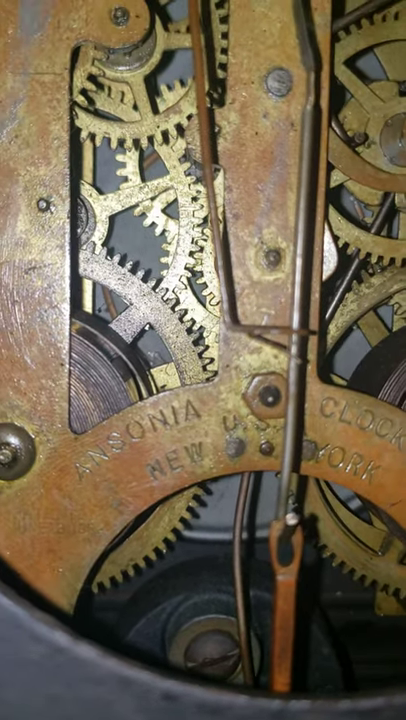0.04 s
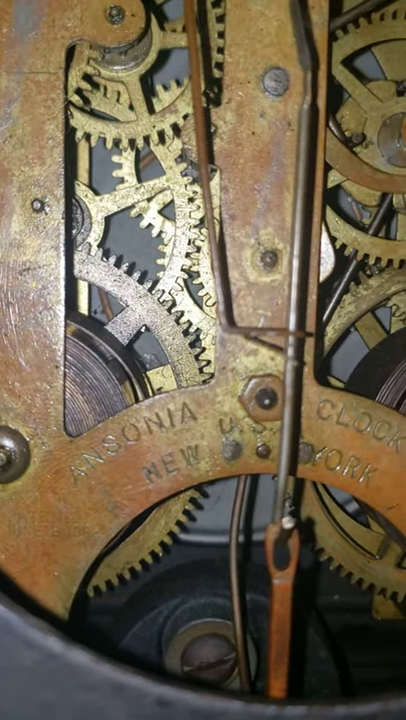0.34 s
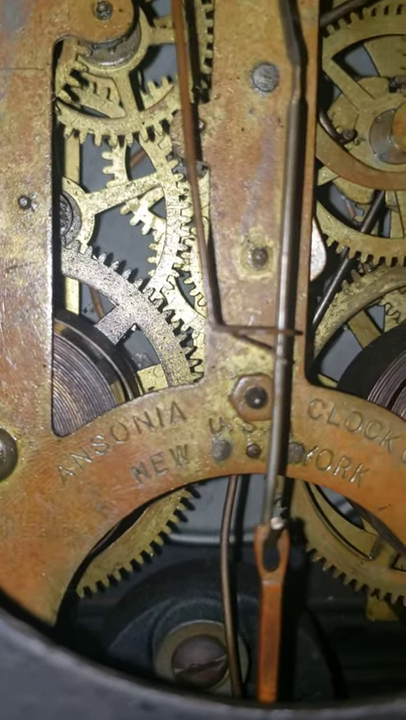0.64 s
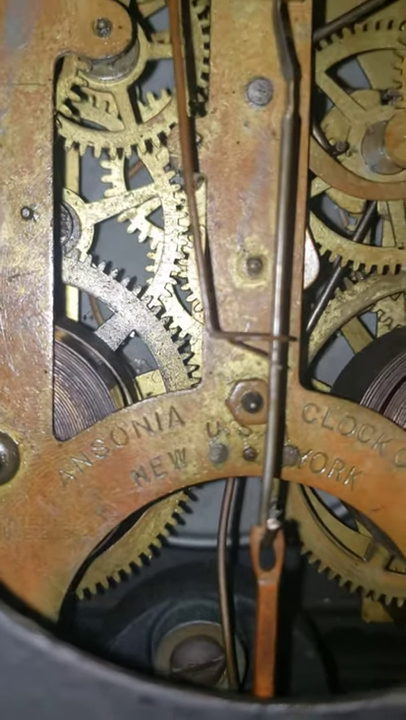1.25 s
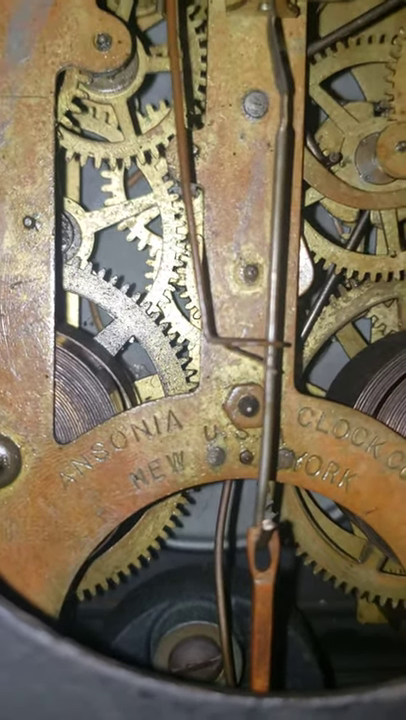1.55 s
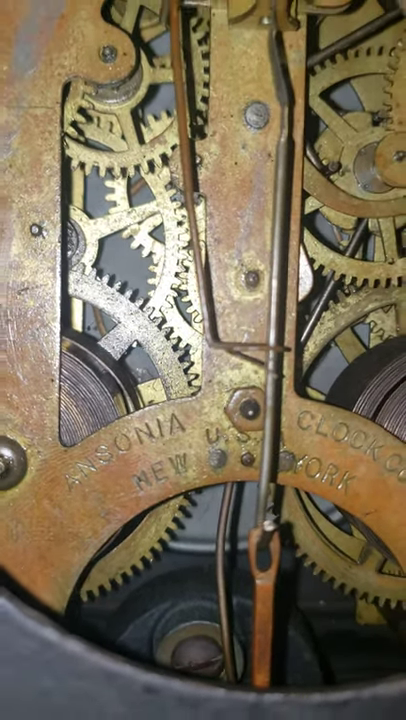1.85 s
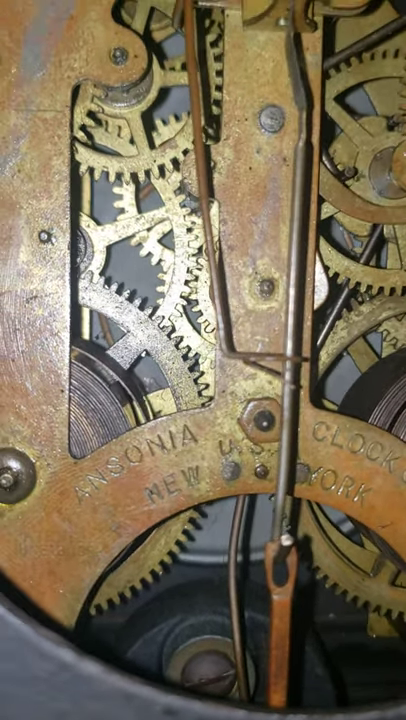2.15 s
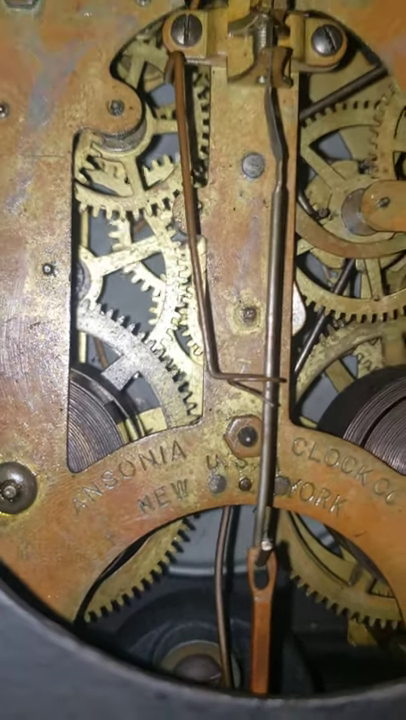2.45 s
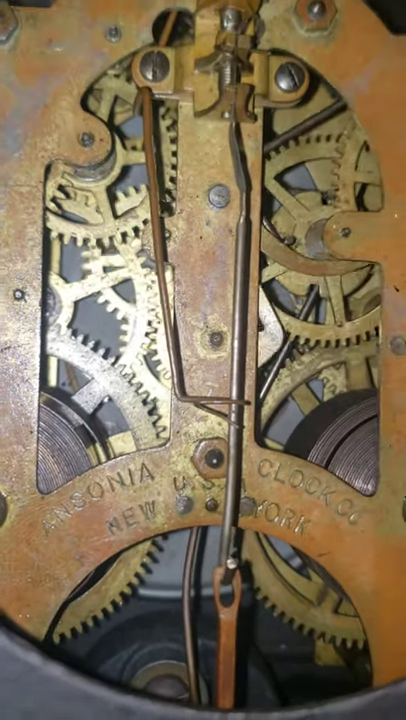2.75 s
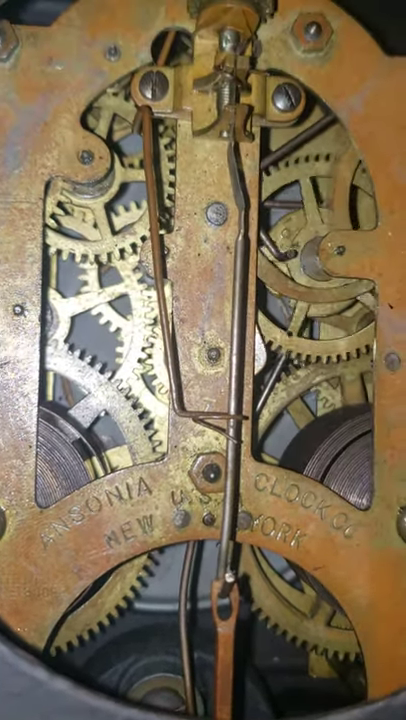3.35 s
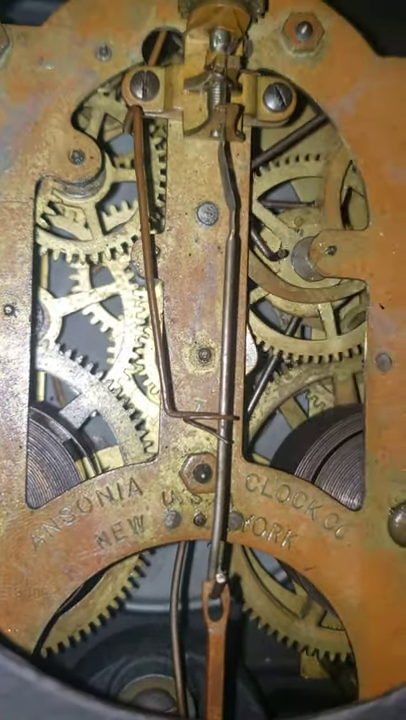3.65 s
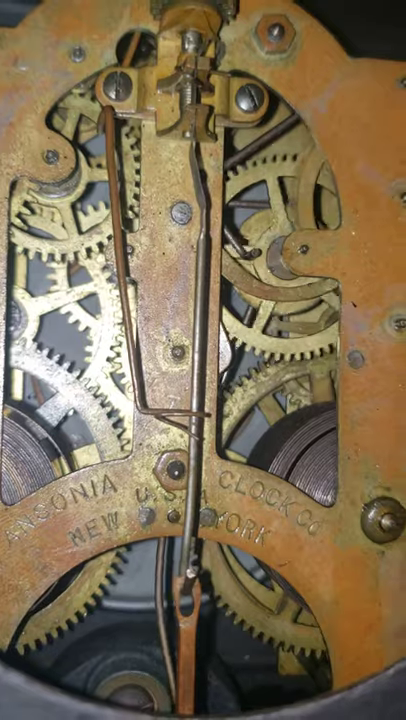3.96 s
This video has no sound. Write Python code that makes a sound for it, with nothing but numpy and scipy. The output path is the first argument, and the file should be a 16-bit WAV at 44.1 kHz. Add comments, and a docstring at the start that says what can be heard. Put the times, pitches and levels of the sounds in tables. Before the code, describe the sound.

A mechanical clock ticks faintly and gets bumped, then snaps into a rapid metallic whirr.

```python
"""Clocks tick faintly across a quiet room while fingers bump, tap and brush an old brass clock movement.
Just before 3 s the strike train is let go and its wheels start to turn, one click per pinion leaf.
At 3.2 s a steel lever snaps over and bounces, ringing the frame. The wheels spin on up into a whirring
rattle that swells once per turn of the fly, with a few hard catches and a brassy ring."""
import sys
import numpy as np
from scipy import signal
from scipy.fft import rfft, irfft, next_fast_len
from scipy.io import wavfile

SR = 44100
rng = np.random.default_rng(int(sys.argv[2]) if len(sys.argv) > 2 else 0)


def unload_wav(signal):
    """Save mono or channel-first audio to the path in sys.argv[1] as 16-bit WAV at rate SR, clipped to [-1, 1]."""
    wavfile.write(
        sys.argv[1],
        SR,
        np.round(np.clip(np.atleast_2d(signal).T, -1, 1) * 32767).astype(np.int16),
    )


N = 176400

# spin-up of the fly: t/s, speed/(turns per s)
FLY_SPEED = [(2.97, 9), (3.08, 14.5), (3.16, 19.5), (3.2, 20), (3.27, 17.5), (3.35, 22.5), (3.44, 27.5),
             (3.56, 33), (3.64, 35), (4, 35)]
# how hard the teeth mesh: t/s, level/dB
MESH_FORCE = [(2.96, -88), (3.0, -54), (3.055, -52), (3.08, -45.5), (3.15, -42), (3.29, -43.5), (3.34, -39),
              (3.45, -39), (3.56, -40), (3.8, -40), (4, -39.5)]
# bright rattle of the mesh: f/Hz, level/dB
MESH_EQ = [(150, -33), (500, -19.5), (1200, -12), (2200, -2.5), (3500, -6), (4100, -5.5), (5300, -4.5),
           (7300, 3), (8200, -9), (9300, -3), (11000, -4), (13800, -10.5), (15600, -15)]
# teeth that catch hard: t/s, level/dB
TOOTH_CATCHES = [(3.371, -35), (3.41, -32), (3.522, -30.5), (3.551, -27), (3.582, -29.5), (3.759, -28.5),
                 (3.831, -31), (3.925, -32.5)]
# ring of wheels and plates: f/Hz, t60/s, level/dB
BRASS_MODES = [(309.8, 0.22, -5.5), (805.4, 0.16, -4), (1581, 0.23, 2.5), (1625, 0.2, 3), (1684, .09, 2),
               (1890, 0.28, 0.5), (2094, 0.04, 0), (2830, 0.1, -7), (3015, 0.028, -2.5),
               (5215, 0.047, -1.5), (5400, 0.046, -1), (6586, 0.079, 4.5), (6647, 0.033, 4.5),
               (7060, 0.027, 1.5), (9200, 0.029, 1), (10820, .11, 0)]
# stereo width of that ring: f/Hz, L-R likeness
BRASS_LIKENESS = [(380, 1), (750, -0.77), (1600, 0.043), (2400, -0.59), (5000, 0.22)]

# the lever's snap and bounces: t/s, level/dB, t60/s
LEVER_HITS = [(3.176, -19.5, 0.047), (3.1973, -7, 0.0045), (3.222, -25.5, 0.018), (3.2463, -28, 0.0083)]
# steely crack of the lever: f/Hz, level/dB
LEVER_EQ = [(200, -11), (1000, -7.5), (2700, -10), (4200, -11), (5500, 2), (7300, -2.5), (8200, -5),
            (10000, 4), (11100, 7), (12600, 1.5), (13900, -7), (15200, -3)]
# the lever's blows on the frame: t/s, level/dB
FRAME_HITS = [(3.1775, -11.5), (3.1975, -10)]
# ring of the frame: f/Hz, t60/s, level/dB
FRAME_MODES = [(239.2, 0.25, 5.5), (315, 0.16, -1), (368, 0.18, -3.5), (502, .12, -10.5), (783, .15, -5),
               (1607, 0.083, -3), (1904, 0.14, -5), (2444, 0.15, -11), (3290, .03, -5)]
# frame and case radiate little bass: f/Hz, level/dB
KNOCK_EQ = [(40, -49), (170, -18), (270, 3), (15000, 2.5)]
# the plate swings up while the lever flies and is checked as it lands: t/s, level/dB
PLATE_SWING = [(3.173, -120), (3.178, -43), (3.185, -42.5), (3.192, -32), (3.197, -38.5), (3.205, -64),
               (3.22, -120)]

# bumps on the case: t/s, thud/dB, click/dB, boom/dB, rise/s
CASE_BUMPS = [(0.13, -44.5, -33.5, -23.5, 0.0012), (0.341, -46.5, -36.5, -29, 0.002),
              (0.368, -45, -34.5, -25, 0.0047), (0.821, -49.5, -48, -20, 0.00903),
              (1.542, -44, -54.5, -26, 0.0014), (1.571, -49.5, -59, -18, 0.00214),
              (2.016, -53.5, -63, -27, 0.0012), (2.53, -57.5, -43, -25.5, 0.0018)]
# dull body of a bump: f/Hz, level/dB
THUD_EQ = [(60, -17.5), (180, -5), (300, 4), (430, -6.5), (600, -8), (820, 1.5), (1100, -10), (1900, -20),
           (9000, -58)]
# sharp edge of a bump or a loose part: f/Hz, level/dB
CLICK_EQ = [(200, -4.5), (1000, -25), (1700, -1.5), (1950, 9), (2300, -1), (3300, -2.5), (5000, -1.5),
            (5650, 5.5), (7200, 1), (8500, -10.5), (12000, -11), (15500, -22)]
# boom of the case: f/Hz, t60/s, level/dB
CASE_MODES = [(239, 0.13, -0.5), (309.4, 0.19, 4), (366.4, 0.17, -2), (536.6, 0.15, -2.5), (767, 0.15, -5),
              (1940, 0.066, -17.5)]
# small ticks of loose parts: t/s, level/dB
LOOSE_TICKS = [(0.914, -53.5), (1.818, -51), (2.272, -47.5), (2.546, -39), (2.804, -46.5), (3.018, -54),
               (3.065, -45)]

# finger taps: t/s, level/dB, rise/s, t60/s
FINGER_TAPS = [(.256, -44.5, 0.0023, 0.18), (.604, -50.5, .001, 0.12)]
# soft tone of a tap: f/Hz, level/dB
TAP_EQ = [(200, -5), (750, -8.5), (1000, -7), (1280, -0.5), (1600, -12.5), (9000, -40)]
# brush of a sliding finger: f/Hz, level/dB
SLIDE_EQ = [(300, 4.5), (1500, 0.5), (2800, -1.5), (4100, 1.5), (5500, -9.5), (8000, -20), (15000, -26)]
# thumps of the shifting grip: t/s, level/dB, rise/s, t60/s
GRIP_THUMPS = [(.25, -43.5, 0.034, 0.37), (1.52, -47.5, 0.027, 0.36), (2.02, -49.5, 0.016, 0.3),
               (2.39, -39, 0.044, 0.47), (2.53, -39.5, 0.0017, 0.31), (2.79, -48.5, 0.017, 0.29),
               (3.6, -49, 0.059, 0.87), (3.94, -42.5, 0.018, 0.27)]
# low weight of a thump: f/Hz, level/dB
THUMP_EQ = [(20, -17), (40, -15.5), (60, 6), (105, -1), (200, -11.5), (400, -14), (1500, -50.5)]

# pace of each far clock: first beat/s, period/s
CLOCK_BEATS = [(.058, .5), (.254, .3605), (.09, .376), (.045, .361)]
# shape of each clock's tick: level/dB, rise/s, t60/s, L-R likeness
CLOCK_SHAPES = [(-56, .003, 0.48, -0.046), (-45, 0.02, 0.18, -0.58), (-51.5, .016, 0.29, 0.16),
                (-54.5, 0.018, 0.28, -0.024)]
# voice of each clock, one curve apiece: f/Hz, level/dB
CLOCK_EQS = [
    [(300, -23), (2300, -2.5), (2490, 9), (2750, 1), (3550, -14), (3870, 0.5), (4300, -7.5), (7500, -15),
     (11000, -13.5), (15000, -31)],
    [(200, -20), (960, -4), (1130, -9), (1380, 5.5), (1600, -10.5), (3500, -28), (12000, -50)],
    [(200, -16.5), (850, 7), (1300, -6.5), (2000, -1), (3800, -21.5), (4400, -10), (14000, -39)],
    [(200, -20.5), (750, 0), (2200, 5), (3400, -11), (6200, -6), (8300, -19), (12000, -12.5), (15000, -29)],
]

# decay of the room: f/Hz, t60/s
ROOM_DECAY = [(200, 0.39), (2000, 0.39), (6000, 0.095), (14000, 0.07)]
# bed of rumble and hiss: f/Hz, level/dB
ROOM_TONE_EQ = [(15, -65), (25, -30), (75, -0.5), (305, -10.5), (537, -15), (722, -3.5), (782, -10),
                (895, -5), (1020, -16.5), (1380, -12), (1710, -16), (2560, -15.5), (3530, -23.5),
                (3830, -25), (6210, -17.5), (8350, -32), (15500, -29)]
# narrow hums in the room: f/Hz, level/dB
ROOM_HUMS = [(97, -69.5), (310, -74)]
# default stereo width (1 in phase, -1 opposed): f/Hz, L-R likeness
LIKENESS = [(60, 0.82), (290, 0.95), (640, 0.67), (1410, -0.54), (3100, -0.012), (6800, 0.073),
            (15000, -0.15)]
# pan of gears and lever: f/Hz, L-R/dB
WORKS_PAN = [(100, -1), (350, -7), (1300, 1.5), (4400, -2), (6500, -5.5), (7800, 1), (9500, -12.5),
             (12500, -10), (15500, -5)]
# pan of case, hand and background: f/Hz, L-R/dB
AMBIENT_PAN = [(60, -3.5), (200, 1), (400, -6.5), (1300, 0), (8000, -3)]

LEAVES, HEAVY_AT_S = 6, 3.553  # leaves per pinion; a moment when the swell peaks
SWELL_DB, LEAF_SCATTER_DB, LEAF_JITTER_S = 5, 3, .0005
LEAF_T60, CHATTER_S, CHATTER_DB = 0.016, 0.00295, 1.5
WHIRR_DB, WHEEL_T60, WHEEL_DB = -4.5, 0.045, -7.5
RING_DB, RING_GROWTH = -3, 0.88  # the brass rings more as the fly gains speed
CATCH_T60, CATCH_RING_DB = 0.019, 7.5
LEVER_RING_DB, LEVER_RING_T60, SWING_HZ = -11.5, 0.036, 298
THUD_T60, CLICK_T60, CASE_DB = 0.18, 0.037, -3
SLIDE_S, SLIDE_DB, SLIDE_T60 = 2.338, -43.5, 0.47
WORKS_SEND_DB, CASE_SEND_DB, ROOM_TONE_DB = -8, -6, -61
TOP_HZ = 15900


def gear_train():
    """Each pinion leaf clicks, hardest once a turn, and chatters; some teeth catch; the brass rings."""
    time = np.arange(N) / SR
    speed = curve(FLY_SPEED)
    turns = np.cumsum(speed) / SR
    turns -= np.interp(HEAVY_AT_S, time, turns)
    first_leaf = np.ceil(np.interp(MESH_FORCE[0][0], time, turns) * LEAVES)
    leaf_turns = np.arange(first_leaf, turns[-1] * LEAVES) / LEAVES
    jitter, scatter, lag, bounce = rng.standard_normal((len(leaf_turns), 4)).T
    when = np.interp(leaf_turns, turns, time) + LEAF_JITTER_S * jitter
    force = np.interp(when, *np.transpose(MESH_FORCE)) + LEAF_SCATTER_DB * scatter
    clicks = list(zip(when, force + SWELL_DB * np.cos(2 * np.pi * leaf_turns)))
    chatter = list(zip(when + CHATTER_S * np.exp(0.444 * lag), force + CHATTER_DB + 2 * bounce))
    mesh = bursts([(s, db, .0002, LEAF_T60) for s, db in clicks + chatter])
    catches = bursts([(s, db, .0002, CATCH_T60) for s, db in TOOTH_CATCHES])
    # every leaf also sets off the same dense, short ring of the wheel
    t = np.arange(SR // 16) / SR
    wheel = amp(WHEEL_DB - 60 * t / WHEEL_T60) * rng.standard_normal((2, len(t)))
    buzz = signal.fftconvolve(impulses(clicks)[None], wheel, axes=1)[:, :N]
    shake = amp(RING_DB) * mesh * (speed / FLY_SPEED[-1][1]) ** RING_GROWTH * noise()
    blows = amp(CATCH_RING_DB) * impulses(TOOTH_CATCHES) * np.sign(noise())
    brass = placed(ring(shake + blows, BRASS_MODES), WORKS_PAN, likeness=BRASS_LIKENESS)
    whirr = amp(WHIRR_DB) * (mesh + catches) * noise()
    return placed(whirr + buzz, WORKS_PAN, MESH_EQ) + brass


def lever():
    """A steel lever snaps over and bounces: bright cracks, a knock in the frame, a low plate swing."""
    cracks = [(s, db, .0003, t60) for s, db, t60 in LEVER_HITS]
    tails = [(s, db + LEVER_RING_DB, .001, LEVER_RING_T60) for s, db, _ in LEVER_HITS]
    snap = placed(bursts(cracks + tails) * noise(), WORKS_PAN, LEVER_EQ)
    knock = ring(impulses(FRAME_HITS) * np.array([[1], [-.2]]), FRAME_MODES)  # mid, side
    t = np.arange(N) / SR - LEVER_HITS[0][0]
    swing = amp(curve(PLATE_SWING)) * np.sin(2 * np.pi * SWING_HZ * t) * np.array([[1], [0]])
    return snap + placed(knock, WORKS_PAN, KNOCK_EQ) + placed(swing, WORKS_PAN)


def case():
    """Bumps thud and click on the case and make it boom; loose parts tick."""
    when, thud_db, click_db, boom_db, rises = np.transpose(CASE_BUMPS)
    thuds = bursts([(s, db, rise, THUD_T60) for s, db, rise in zip(when, thud_db, rises)])
    clicks = [(s, db, rise, CLICK_T60) for s, db, rise in zip(when, click_db, rises)]
    ticks = [(s, db, .0003, .014) for s, db in LOOSE_TICKS]
    blows = impulses(list(zip(when + rises, boom_db))) * np.array([[1], [.2]])
    boom = ring(blows + .5 * thuds * noise(), CASE_MODES)
    return (amp(CASE_DB) * placed(boom, AMBIENT_PAN, KNOCK_EQ)
            + placed(thuds * noise(), AMBIENT_PAN, THUD_EQ)
            + placed(bursts(clicks + ticks) * noise(), AMBIENT_PAN, CLICK_EQ))


def hand():
    """Light finger taps, one brushing slide and the low thumps of a shifting grip."""
    taps = placed(bursts(FINGER_TAPS) * noise(), AMBIENT_PAN, TAP_EQ)
    slide = placed(bursts([(SLIDE_S, SLIDE_DB, .035, SLIDE_T60)]) * noise(), AMBIENT_PAN, SLIDE_EQ)
    thumps = placed(bursts(GRIP_THUMPS) * noise(), AMBIENT_PAN, THUMP_EQ)
    return taps + slide + thumps


def far_clocks():
    """Four clocks beat at their own rates, each tick a soft wash that is nearly all room."""
    total = 0
    for (first, period), (db, rise, t60, likeness), eq in zip(CLOCK_BEATS, CLOCK_SHAPES, CLOCK_EQS):
        beats = [(s, db, rise, t60) for s in np.arange(first, N / SR, period)]
        total += placed(bursts(beats) * noise(), AMBIENT_PAN, eq, [(20, likeness)])
    return total


def reverb(send):
    """The small room's tail, dying faster in the treble."""
    hz, t, spectrum = signal.stft(rng.standard_normal((2, SR // 2)), SR, nperseg=256)
    decay = amp(-60 * t / along(ROOM_DECAY, hz)[:, None])
    tail = signal.istft(spectrum * decay, SR, nperseg=256)[1]
    return signal.fftconvolve(send, tail / np.linalg.norm(tail[0]), axes=1)[:, :N]


def room_tone():
    """A steady bed of hiss and rumble with two narrow, wavering hums."""
    hum = sum(amp(db) * ring(noise(), [(hz, .4, 0)]) for hz, db in ROOM_HUMS)
    bed = amp(ROOM_TONE_DB) * placed(noise(), AMBIENT_PAN, ROOM_TONE_EQ)
    return bed + placed(hum, AMBIENT_PAN)


def amp(db):
    """Decibels to gain."""
    return 10 ** (np.asarray(db) / 20)


def along(points, hz):
    """Read a curve of f/Hz, value points on a log frequency axis."""
    f, value = np.transpose(points)
    return np.interp(np.log(hz + 1), np.log(f + 1), value)


def curve(rows):
    """Automation line through rows of t/s, value."""
    return np.interp(np.arange(N) / SR, *np.transpose(rows))


def impulses(rows):
    """One-sample spikes from rows of t/s, level/dB."""
    s, db = np.transpose(rows)
    return np.bincount((s * SR).astype(int), amp(db), minlength=N)[:N]


def bursts(rows):
    """Envelope from rows of t/s, level/dB, rise/s, t60/s; overlaps add in power."""
    power = np.zeros(N + 2 * SR)
    for s, db, rise, t60 in rows:
        t = np.arange(int(min(t60 + .01, 1) * SR)) / SR
        attack = 1 - np.exp(-t / rise)
        power[int(s * SR):][:len(t)] += (attack * amp(db - 60 * t / t60)) ** 2
    return np.sqrt(power[:N])


def noise():
    """Two unrelated white noises."""
    return rng.standard_normal((2, N))


def ring(drive, modes):
    """Resonator with unit power gain; modes are f/Hz, t60/s, level/dB."""
    t = np.arange(SR // 3) / SR
    tone = sum(amp(db - 60 * t / t60) / np.sqrt(t60) * np.sin(2 * np.pi * hz * t)
               for hz, t60, db in modes)
    return signal.fftconvolve(drive, tone[None] / np.linalg.norm(tone), axes=1)[:, :N]


def placed(mid_side, pan, eq=((20, 0), (20000, 0)), likeness=LIKENESS):
    """Turn a mid/side pair into left/right with unit-power EQ, width and pan."""
    size = 2 * next_fast_len(N // 2 + 8192)
    hz = np.fft.rfftfreq(size, 1 / SR)
    gain = amp(along(eq, hz))
    gain /= np.sqrt(np.mean(gain ** 2))
    # minimum phase keeps the attacks free of pre-ring
    cepstrum = irfft(np.log(gain + 1e-6))
    cepstrum[1:size // 2] *= 2
    cepstrum[size // 2 + 1:] = 0
    width = np.arccos(np.clip(along(likeness, hz), -1, 1)) / 2
    mid, side = rfft(mid_side, size) * np.exp(rfft(cepstrum)) * [np.cos(width), np.sin(width)]
    lean = amp(along(pan, hz))
    stereo = np.array([(mid + side) * lean, mid - side]) * np.sqrt(2 / (1 + lean ** 2))
    return irfft(stereo, size)[:, :N]


def scene():
    """The movement up close, with a little reverb, over far clocks and room tone."""
    works, bumps = gear_train() + lever(), case()
    send = amp(WORKS_SEND_DB) * works + amp(CASE_SEND_DB) * bumps
    return works + bumps + reverb(send) + hand() + far_clocks() + room_tone()


def record(dry):
    """Brick-wall high cut on the whole mix."""
    size = next_fast_len(N + 8192)
    passband = np.fft.rfftfreq(size, 1 / SR) < TOP_HZ
    return irfft(rfft(dry, size) * passband, size)[:, :N]


dry = scene()
out = record(dry)
unload_wav(out)
```